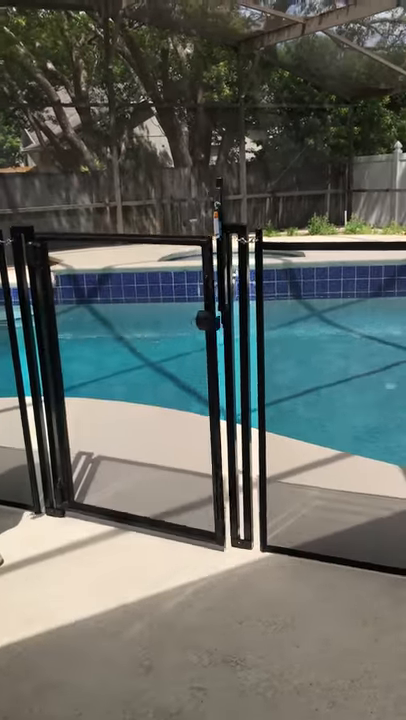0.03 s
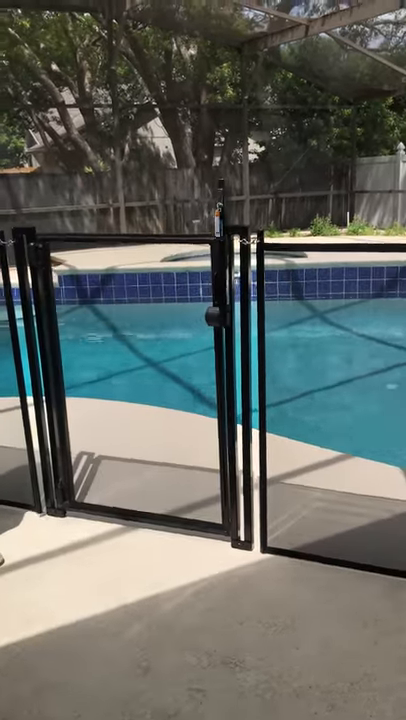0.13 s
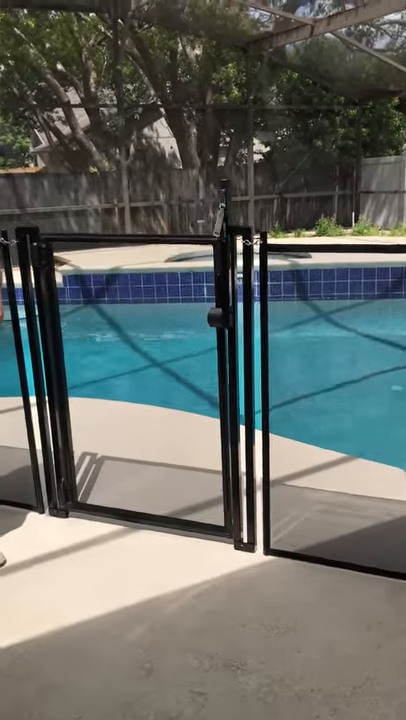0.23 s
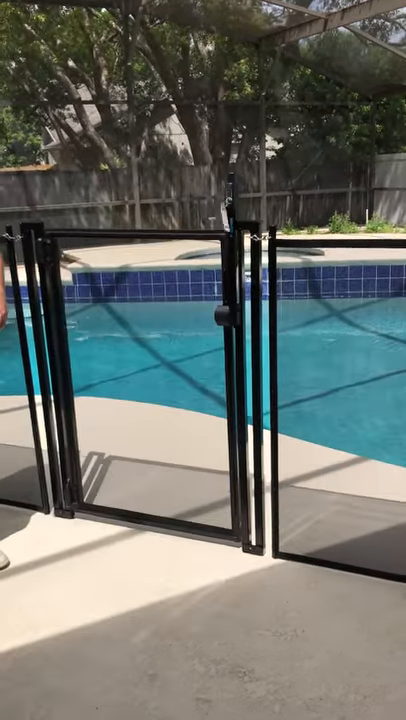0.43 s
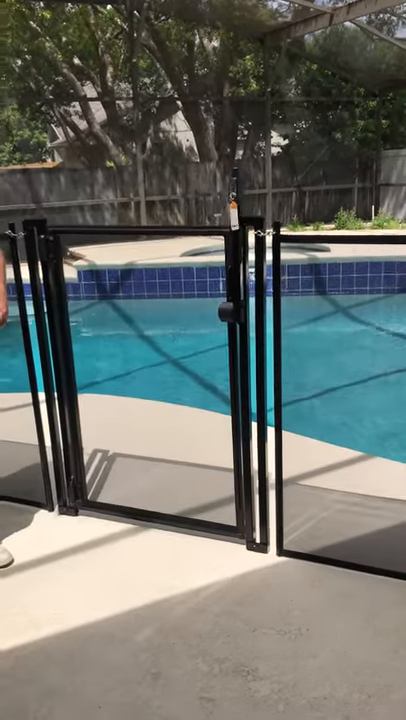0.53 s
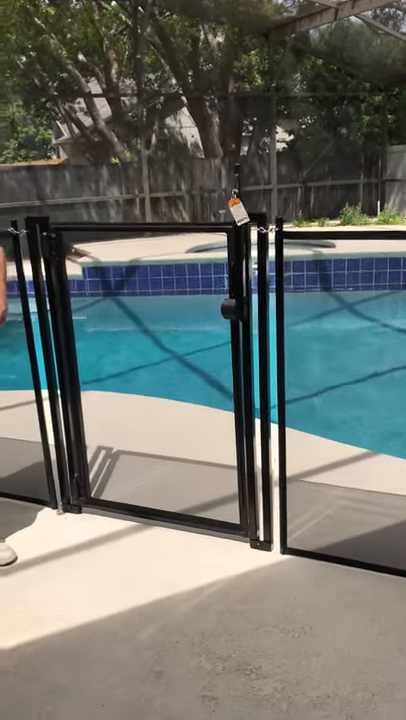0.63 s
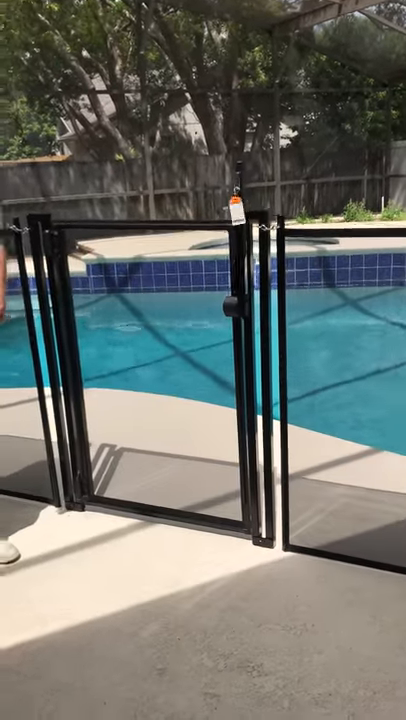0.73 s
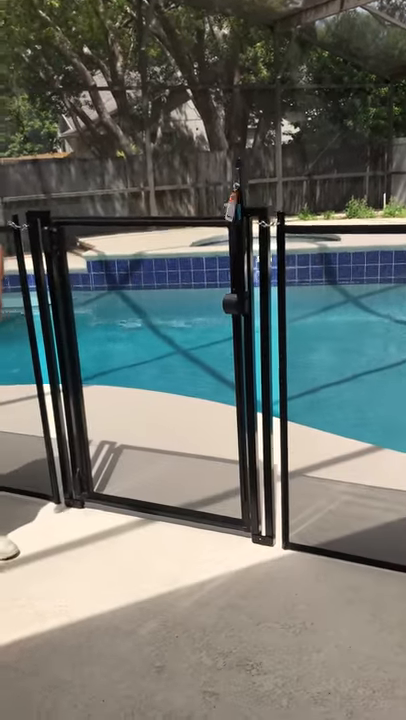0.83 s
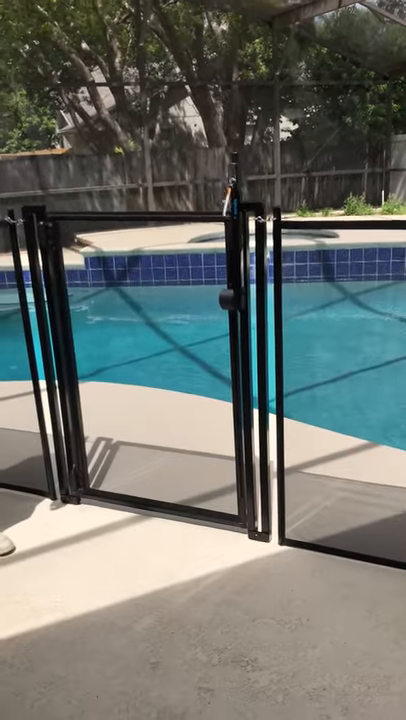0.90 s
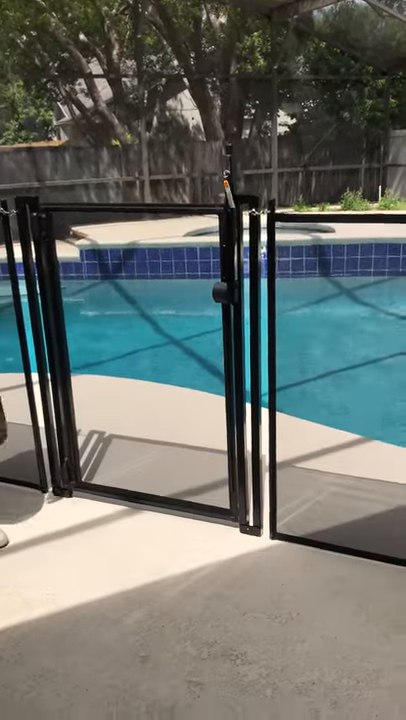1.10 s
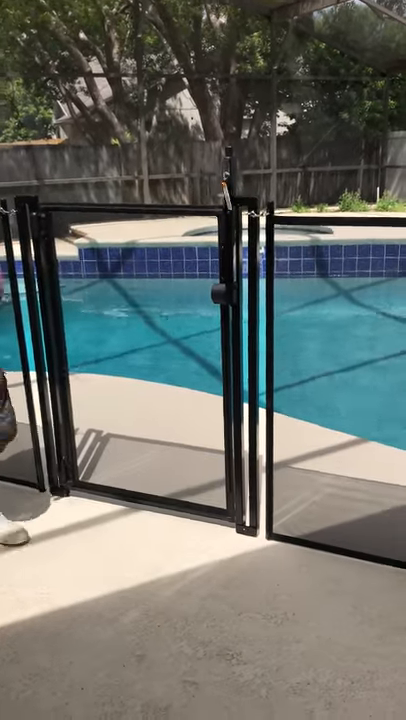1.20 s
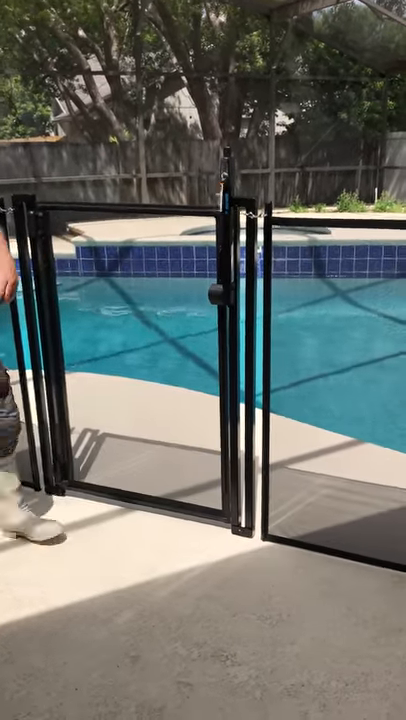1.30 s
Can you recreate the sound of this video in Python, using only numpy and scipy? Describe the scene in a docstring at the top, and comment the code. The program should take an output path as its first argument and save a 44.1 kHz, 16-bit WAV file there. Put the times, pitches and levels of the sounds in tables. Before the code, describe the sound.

On a quiet poolside patio, a nearby metal gate clacks shut. Weaker knocks and bright latch clicks follow and die away quickly, leaving soft outdoor air, a low motor hum and a faint shuffle.

```python
"""Pool gate slamming on a screened patio.

A light metal gate hits its latch post: the tube frame clacks in a quick run of contacts,
then rebounds with duller knocks while the latch jiggles, ticks and rings. Deck, wall and roof
answer with a short tail. A motor, probably the pool pump, hums over quiet outdoor air,
with a faint shuffle nearby and one tiny squeak near the end."""
import sys
import numpy as np
from scipy import signal
from scipy.io import wavfile

SR = 44100
rng = np.random.default_rng(int(sys.argv[2]) if len(sys.argv) > 2 else 0)


def digitize_waveform(pressure):
    """Quantize a signal to 16-bit integers and store it at the path in sys.argv[1].

    Rows of a 2-D input are taken as channels; values are limited to [-1, 1].
    """
    field = np.atleast_2d(pressure).T
    bounded = np.clip(field, -1, 1)
    quanta = np.round(bounded * 32767).astype(np.int16)
    wavfile.write(sys.argv[1], SR, quanta)


N = 59535
T = np.arange(N) / SR
EDGES_HZ = np.geomspace(22, 19000, 30)
CENTRES_HZ = np.sqrt(EDGES_HZ[1:] * EDGES_HZ[:-1])


def from_db(db):
    """Decibels to gain."""
    return 10 ** (np.asarray(db) / 20)


def fade(t60):
    """A decay that loses 60 dB in t60 seconds."""
    return np.exp(-np.log(1000) * T / np.maximum(t60, 1e-4))


def per_band(table, column=1):
    """A table's column read at the band centres."""
    table = np.array(table)
    return np.interp(np.log(CENTRES_HZ), np.log(table[:, 0]), table[:, column])


def octaves(hz, floor_hz=574):
    """Octaves above 2 kHz, held constant in the bass."""
    return np.log2(np.maximum(hz, floor_hz) / 2000)


def noise_bands():
    """White noise split into third-octave bands, neighbours unrelated."""
    white = rng.standard_normal((2, N + SR // 2))
    filters = [signal.butter(2, EDGES_HZ[k:k + 2], "band", fs=SR, output="sos")
               for k in range(len(CENTRES_HZ))]
    return np.array([signal.sosfilt(sos, white[k % 2])[-N:] for k, sos in enumerate(filters)])


def band_gains(spectrum, tilt_db=0):
    """Band gains that give noise this spectrum, tilted by tilt_db per octave, at an rms near 1."""
    gains = from_db(per_band(spectrum) + tilt_db * octaves(CENTRES_HZ))
    return gains / np.sqrt(np.sum(gains ** 2 * np.diff(EDGES_HZ)) * 2 / SR)


def drift(per_s):
    """Random wander of spread about 1."""
    return np.interp(T * per_s, np.arange(200), rng.standard_normal(200))


def add(out, start_s, sound):
    """Mixes a sound in from a given time on."""
    start = int(start_s * SR)
    out[start:] += sound[:N - start]


def outdoor_air():
    """A quiet, steady bed of dark noise."""
    # air spectrum: f/Hz, relative density/dB
    spectrum = [(15, -40), (25, -20), (48, -3.5), (146, -14), (239, -7.5), (315, -16), (351, 5),
                (382, -21.5), (414, -14), (489, -21.5), (531, -16), (1470, -21), (8800, -37.5),
                (16600, -53.5), (18000, -45)]
    return from_db(-48) * (band_gains(spectrum) @ noise_bands())


def shuffle():
    """A faint shuffle nearby: flickering noise that swells near the end."""
    # rustle spectrum: f/Hz, relative density/dB
    spectrum = [(200, -10), (700, 0), (2200, 4), (4000, 3), (7000, -23), (10000, -19), (13000, -12),
                (17000, -15)]
    # swells: t/s, level/dB
    swells = [(0, -61), (.88, -64), (1.06, -56), (1.15, -66), (1.25, -55), (1.35, -55)]
    level_db = np.interp(T, *np.transpose(swells)) + 3.5 * drift(per_s=120)
    return from_db(level_db) * (band_gains(spectrum) @ noise_bands())


def motor_hum():
    """A motor's low partials, each wavering in level and phase."""
    # partials: f/Hz, rms level/dB
    partials = [(55, -55), (119, -60), (246, -63), (349.5, -52.5)]
    waver_db, waver_rad, wavers_per_s = 2, 0.88, 8.6
    hum = np.zeros(N)
    for hz, db in partials:
        amplitude = np.sqrt(2) * from_db(db + waver_db * drift(wavers_per_s))
        hum += amplitude * np.sin(2 * np.pi * hz * T + waver_rad * drift(wavers_per_s))
    return hum


def struck_metal(contacts, clack_spectrum, modes, clack_t60_s):
    """Contacts excite crowded, quickly damped modes and a few lasting ones: (clacks, ringing)."""
    clacks, ringing, bands = np.zeros(N), np.zeros(N), noise_bands()
    band_t60 = clack_t60_s * 2 ** (-0.16 * octaves(CENTRES_HZ))   # higher modes die sooner
    crack = fade(t60=0.0073)   # the instant of contact
    envelopes = fade(band_t60[:, None]) + crack
    hz, mode_db, mode_t60 = np.transpose(modes)
    rings = np.sin(2 * np.pi * hz[:, None] * T) * fade(mode_t60[:, None])
    for start_s, db, tilt_db, ring_db, rise_s in contacts:
        attack = from_db(db) * (1 - np.exp(-T / max(rise_s, 1 / SR)))   # glancing contacts rise slowly
        scatter_db = 0.5 * rng.standard_normal(len(hz))
        strengths = from_db(ring_db + mode_db + tilt_db * octaves(hz) - scatter_db)
        bursts = np.roll(bands, rng.integers(N), axis=1) * envelopes
        polarities = rng.choice([-1, 1], len(hz))
        add(clacks, start_s, attack * (band_gains(clack_spectrum, tilt_db) @ bursts))
        add(ringing, start_s, attack * ((strengths * polarities) @ rings))
    return clacks, ringing


def gate_frame():
    """The tube frame slams into the post, then rebounds with duller knocks."""
    # contacts with the post: t/s, level/dB, brightness/(dB per octave), ring/dB, rise/s
    knocks = [(0.2263, -16.5, 0, -7, 0.00029), (0.2287, -14, 0, -6, 0.00015),
              (0.2322, -17.5, 1.5, -9, 0.0003), (0.2352, -19, 1.5, -7, .0004),
              (0.2378, -23, 2.5, -3, 0.00088), (0.247, -23.5, -3, 0.5, 0.0011),
              (0.268, -21, -3, -7.5, 0.001), (0.283, -30.5, -9, -2.5, 0.0037),
              (0.2965, -24, -8.5, -10, 0.0013), (0.3688, -34, -0.5, -20, 0.001),
              (0.4395, -24.5, -2.5, -0.5, 0.001), (0.445, -29.5, -1, 0.5, 0.00067),
              (0.477, -27.5, -3.5, -8, 0.0042), (0.579, -29, -5.5, -1.5, 0.0017),
              (0.582, -30, -4, -6.5, 0.0016), (0.700, -44, -4, 0.5, .003), (0.748, -38.5, -5.5, -5, 0.0022)]
    # crowded modes of the frame: f/Hz, relative density/dB
    clack = [(30, -57), (80, -15), (150, -30), (300, -16), (450, -18), (570, -9), (750, -13.5), (1000, -3),
             (1400, -2), (2100, -7.5), (3600, -4.5), (4800, -13), (9500, -16.5), (13000, -19), (17000, -28)]
    # ringing of the tubes: f/Hz, relative level/dB, t60/s
    modes = [(291.7, -27.5, 0.3), (545, -20, .15), (568.8, -19, 0.28), (917, -14.5, 0.24), (945, -12, 0.16),
             (1172, -35, 0.15), (1462, -15, 0.38), (1862, -12, 0.27), (1868, -10, 0.23), (2036, -16, 0.32),
             (2430, -8.5, 0.21), (2574, -14, 0.18), (2763, -31, 0.13), (3810, -7, 0.093), (6160, -16, 0.11),
             (7000, -32, 0.091)]
    return struck_metal(knocks, clack, modes, clack_t60_s=0.064)


def gate_latch():
    """The latch jiggles in bright clicks, each with a short, high ring."""
    # latch contacts: t/s, level/dB, brightness/(dB per octave), ring/dB, rise/s
    clicks = [(0.2266, -27.5, 8.5, -6.5, 0.00015), (0.2985, -25, 2, 0.5, 0.00066), (0.309, -31, 3, 4, .002),
              (0.3225, -45, -5, -5, .001), (0.361, -61, -17, 1, 0.0037), (0.3692, -22, -1.5, -3, 0.0002),
              (0.3762, -29.5, 4.5, 1.5, 0.0014), (0.427, -34, -26, 0, 0.0048),
              (0.4405, -32, -8, 10, 0.0016), (0.488, -30, 0, 4.5, 0.0034), (0.5607, -31, 1.5, 5.5, 0.00055),
              (0.594, -34, -1, 0, 0.00039), (0.6188, -37.5, 0, 9, 0.00067), (0.677, -55, 5, -15, 0.0013),
              (0.691, -45, -4, 12.5, 0.0014), (0.7605, -42, 0.5, 3, 0.0014)]
    # crowded modes of the latch: f/Hz, relative density/dB
    clack = [(100, -30), (800, -13), (2200, 3.5), (3200, 3), (4000, -10), (4800, -4.5), (8000, -11.5),
             (10500, -12), (17000, -24.5)]
    # ringing of the latch: f/Hz, relative level/dB, t60/s
    modes = [(3085, -2, 0.037), (3150, -3, 0.1), (3197, -7, 0.081), (3440, -9, 0.087), (3880, -9, 0.074),
             (3940, -6, 0.12), (5750, -16, 0.069), (7980, -26, 0.13), (9835, -12.5, 0.052),
             (12300, -27, .1)]
    return struck_metal(clicks, clack, modes, clack_t60_s=0.082)


def patio(send, build_s=0.01):
    """Reflections from deck, wall and roof build up and die away, the treble first."""
    # reverb tail: f/Hz, gain/dB, t60/s
    tail = [(148, 0.5, 1.3), (298, -1.5, 0.8), (596, -6, 0.89), (1120, -9, 1.58), (2090, -2.5, 0.51),
            (3940, -2.5, 0.57), (7500, -3, 0.43), (15900, -4, 0.28)]
    envelopes = fade(per_band(tail, column=2)[:, None]) * (1 - np.exp(-T / build_s))
    envelopes /= np.sqrt(np.sum(envelopes ** 2, axis=1, keepdims=True))
    response = from_db(per_band(tail)) @ (noise_bands() * envelopes)
    return signal.fftconvolve(send, response)[:N]


def latch_ticks():
    """Loose latch parts give small dry ticks as the gate settles."""
    # ticks: t/s, level/dB, brightness/(dB per octave)
    ticks = [(0.2715, -28, 10), (0.3225, -28, 15), (0.3772, -29.5, 13), (0.487, -38, 17), (0.594, -38, 12),
             (0.83, -33.5, -1.5)]
    # tick spectrum: f/Hz, relative density/dB
    spectrum = [(1200, -18), (3400, 6.5), (4800, -13), (6300, -8), (8000, -17), (11000, -13), (14500, -26),
                (17000, -35)]
    out, bands = np.zeros(N), noise_bands()
    for start_s, db, tilt_db in ticks:
        noise = np.roll(band_gains(spectrum, tilt_db) @ bands, rng.integers(N))
        add(out, start_s, from_db(db) * noise * fade(t60=0.011))
    return out


def squeak(peak_s=1.202, hz=1590, width_s=0.0062):
    """A faint squeak: one short blip of pure tone."""
    envelope = np.exp(-((T - peak_s) / width_s) ** 2)
    return from_db(-44.5) * envelope * np.sin(2 * np.pi * hz * T)


def scene():
    """Frame and latch feed the patio's tail; the small sounds and the background stay dry."""
    frame_clack, frame_ring = gate_frame()
    latch_clack, latch_ring = gate_latch()
    clacks = frame_clack + latch_clack
    tail = patio(clacks + from_db(-1.5) * frame_ring + from_db(-7.5) * latch_ring)
    gate = clacks + frame_ring + latch_ring + latch_ticks()
    return (gate + tail + squeak() + outdoor_air() + shuffle() + motor_hum())[None]


def record(dry, low_cut_hz=42, high_cut_hz=18700, ceiling=0.75):
    """The deep bass is cut, peaks are rounded, the top is cut."""
    thinned = signal.sosfilt(signal.butter(4, low_cut_hz, "high", fs=SR, output="sos"), dry)
    rounded = ceiling * np.tanh(thinned / ceiling)
    return signal.sosfilt(signal.cheby2(12, 60, high_cut_hz, fs=SR, output="sos"), rounded)


dry = scene()
out = record(dry)
digitize_waveform(out)
```